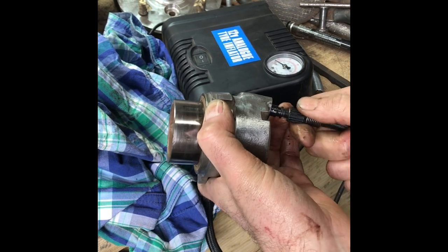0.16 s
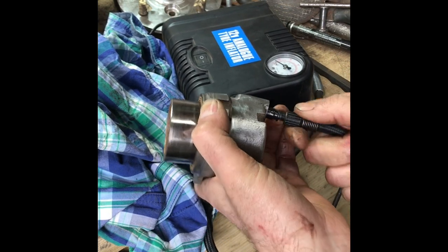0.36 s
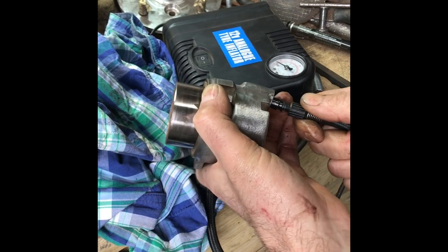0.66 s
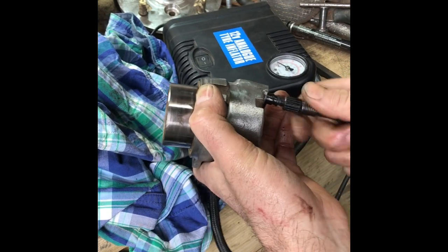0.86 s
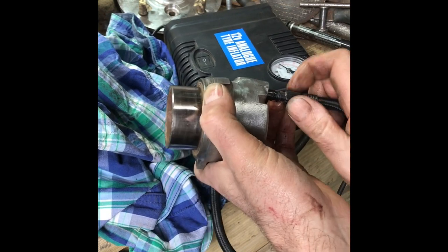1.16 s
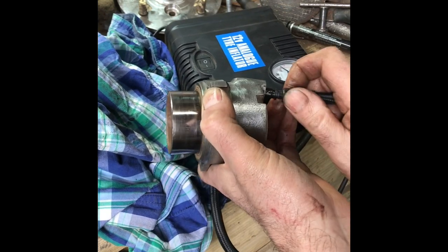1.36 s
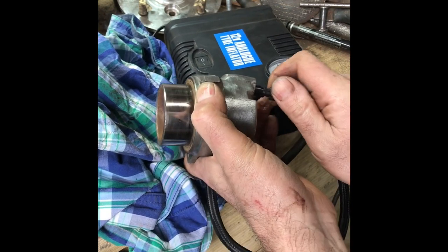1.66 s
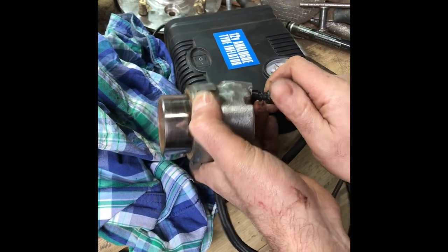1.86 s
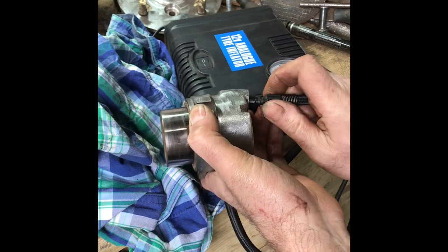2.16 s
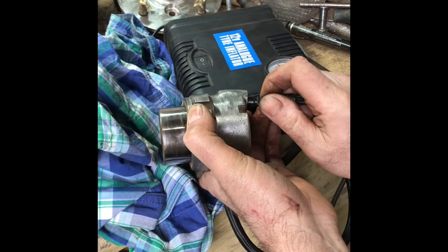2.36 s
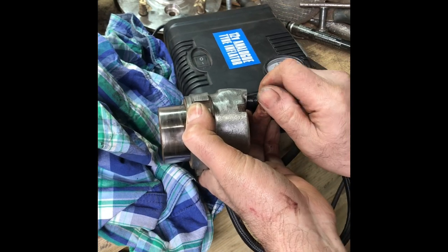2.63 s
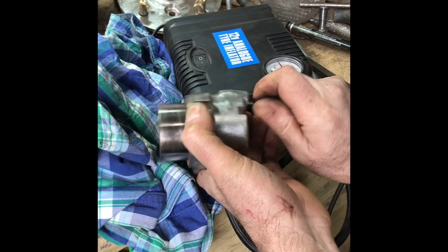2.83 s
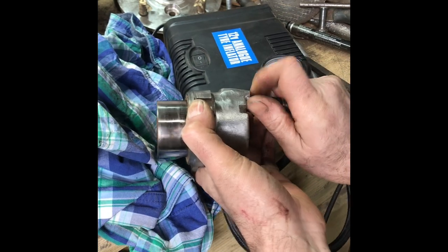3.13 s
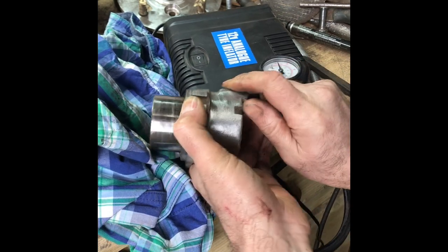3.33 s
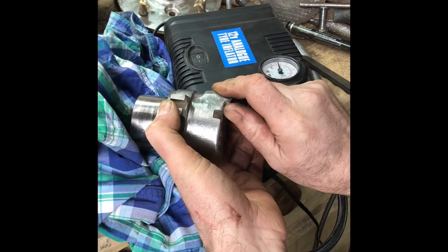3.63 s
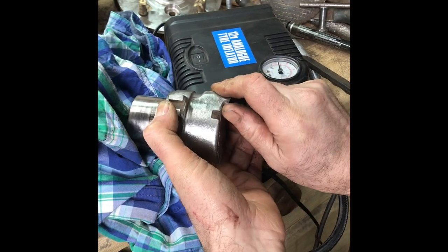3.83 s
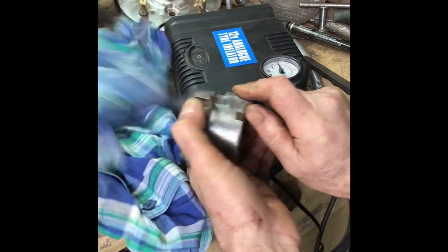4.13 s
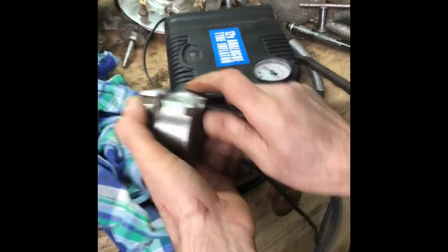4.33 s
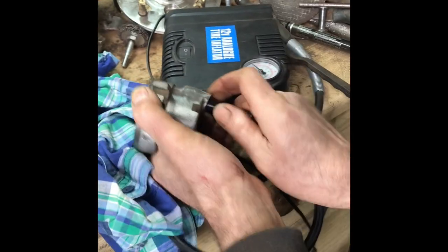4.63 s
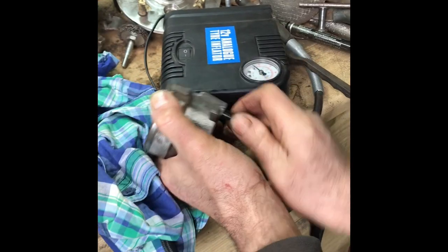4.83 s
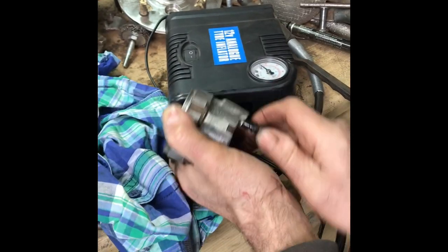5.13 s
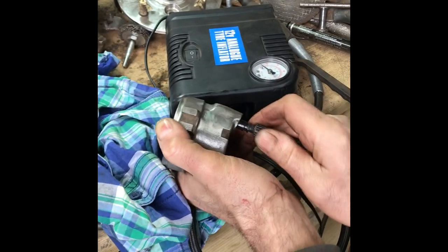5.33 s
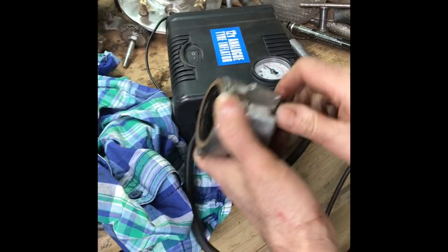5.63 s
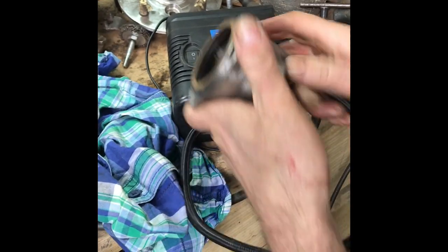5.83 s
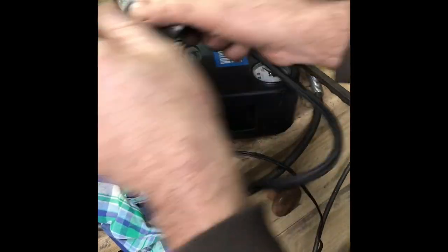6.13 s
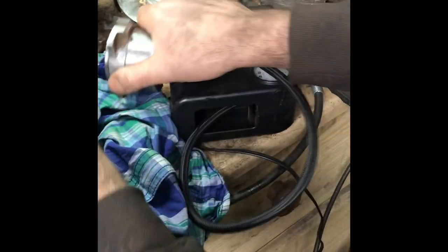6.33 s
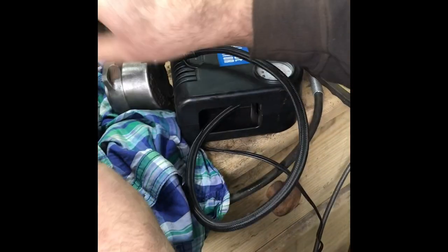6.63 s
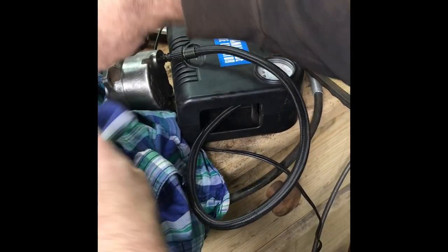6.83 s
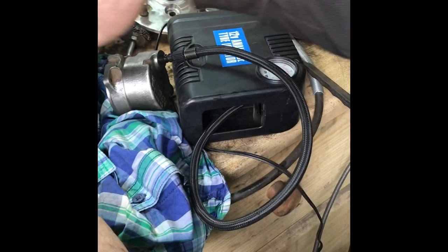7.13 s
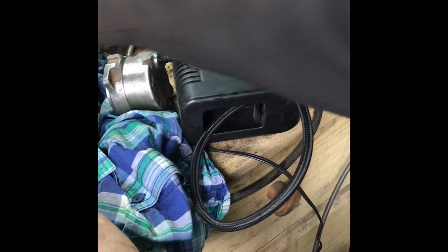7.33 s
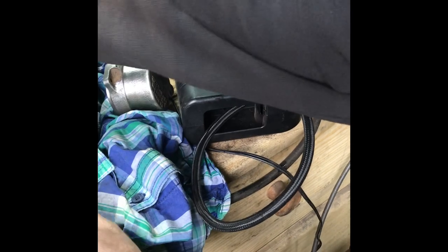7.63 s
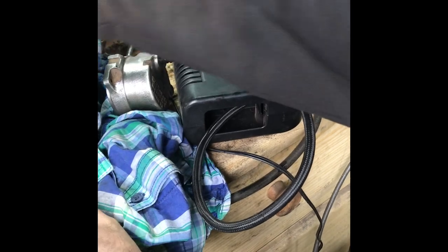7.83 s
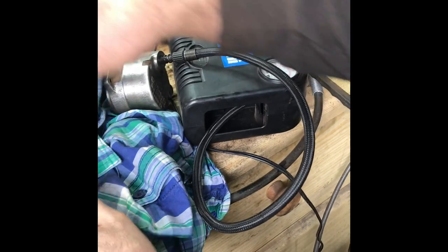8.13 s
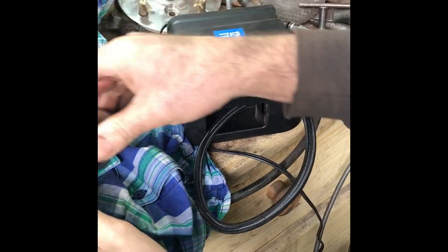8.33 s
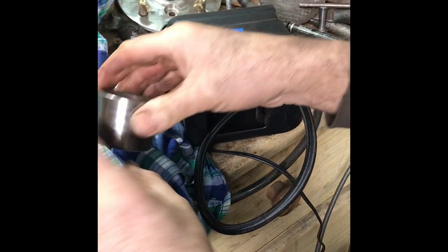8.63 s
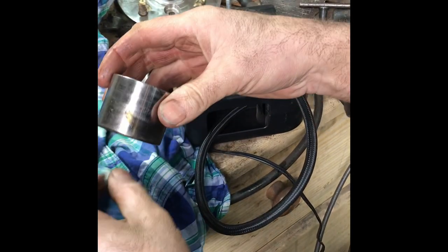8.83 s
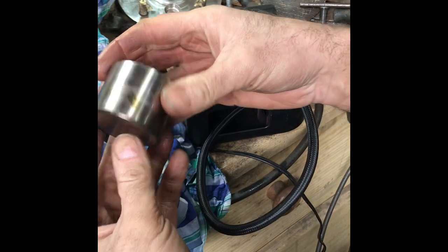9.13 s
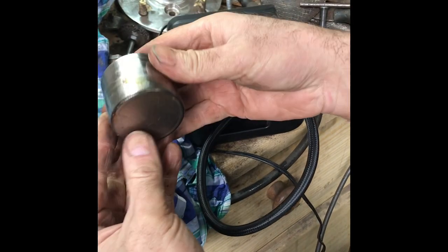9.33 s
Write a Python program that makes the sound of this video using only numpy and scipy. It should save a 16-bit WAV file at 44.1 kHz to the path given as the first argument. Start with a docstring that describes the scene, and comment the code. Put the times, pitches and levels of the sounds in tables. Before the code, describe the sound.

Close and dry at a workshop bench, a tyre pump drones with hard metallic clatter and a low hum. Its pitch sags under load while a nasal valve tone grows. A piston pops free with a thumping air blast, pushing the sound down before it recovers. Faster, steadier rattling continues with uneven airy puffs, faint rubbing, a solid knock as metal is laid on the bench, and a fine whistle.

```python
"""A small piston tyre inflator rattles and hums on a workbench, slowing as it pumps up a steel cylinder.
The cylinder's piston pops loose with a burst of air; the microphone's gain control ducks and creeps back.
The unloaded pump runs on faster, puffing and whistling through the open cylinder, as hands shift the parts.
Crank-timed blows and noise ring through resonances for the pump; struck modes make the pop and bumps,
and filtered noise makes the burst and the rubbing."""
import sys
import numpy as np
from scipy import signal
from scipy.fft import rfft, irfft, next_fast_len
from scipy.io import wavfile
from scipy.ndimage import uniform_filter1d, minimum_filter1d

SR = 44100
rng = np.random.default_rng(int(sys.argv[2]) if len(sys.argv) > 2 else 0)


def inscribe(sig):
    """Save sig as 16-bit PCM at rate SR to the path in sys.argv[1].

    A 1-D sig is mono; a 2-D sig holds one channel per row.
    Samples are clipped to [-1, 1] before scaling.
    """
    pcm = np.round(np.clip(np.atleast_2d(sig).T, -1, 1) * 32767)
    wavfile.write(sys.argv[1], SR, pcm.astype(np.int16))


N = 418068

# crank speed, before a slight wobble: time_s, speed_turns_per_s
CRANK_SPEED = [(0.0, 41.79), (0.16, 41.758), (0.81, 42.25), (1.2, 41.487), (1.56, 41.923), (2.04, 40.814),
               (2.35, 41.141), (2.86, 39.321), (3.48, 38.898), (4.05, 38.824), (4.27, 45.214),
               (4.91, 45.023), (6.23, 45.273), (7.06, 45.148), (9.48, 45.261)]
START_TURNS = .971
# how far the pump has laboured up to full pressure: time_s, share_0_to_1
PRESSURE_CURVE = [(0, .1), (1.8, .2), (2.5, .45), (3.1, .85), (3.5, .97), (4.1, 1)]
RELEASE_S, RELEASE_FADE_S = 4.12, 0.026   # the piston comes loose and the load is gone
SET_DOWN_S, SET_DOWN_FADE_S = 6.35, 0.47   # the cylinder is laid on the bench

# strength of the pump's noises: thud_db, knock_db, valve_clatter_db, gear_rattle_db, air_hiss_db
LIGHT_LEVELS = (-18.5, -17.5, -25.8, -22.5, -28.5)
HEAVY_LEVELS = (-22.5, -24, -23, -22.5, -28.5)
FREE_LEVELS = (-20, -22, -23.5, -22.6, -27)
# answer of the case to a stroke at low pressure, at high pressure and running free:
# pitch_hz, relative_level_db, crank_angle_turns (where that pitch swells)
LIGHT_CASE = [(293, -38, 0.62), (340, -20, 0.49), (375, -12, 0.62), (468, -19.5, 0.56), (505, -14, 0.65),
              (658, -6.5, 0.48), (688, 1.5, 0.61), (810, -4.5, 0.68), (910, -13.5, 0.64), (1015, -12, 0.36),
              (1093, -3, 0.57), (1140, -16, 0.5), (1207, -5, 0.4), (1256, -16, 0.37)]
HEAVY_CASE = [(279, -18.5, 0.663), (308, -40, 0.51), (337, -9.5, 0.52), (462.5, -7, 0.62),
              (475, -10.5, 0.711), (677.5, -4, 0.49), (742, -0.2, 0.43), (757, -24, 0.65),
              (880, -7.5, 0.48), (980, -18, 0.43), (1011, -2.5, 0.57), (1150, -8, 0.46), (1177, -17, 0.33),
              (1260, -15, 0.4)]
FREE_CASE = [(316, -25, .49), (361, -10, .5), (402, -16, .56), (450, -12, .61), (575, -10, .52),
             (630, -7, .58), (685, 2, .62), (760, -9, .64), (815, -5, .7), (865, -15, .66), (950, -11, .6),
             (1080, -7.5, .5), (1185, -7, .56), (1310, -23, .34)]
# colour of the rattling: pitch_hz, relative_level_db
LOADED_COLOUR = [(1200, 3.5), (1400, 5.5), (1750, 2.5), (2000, -8.5), (2300, -8.5), (2950, -11.5),
                 (3800, -13), (4400, -15), (5400, -16), (7700, -20), (8400, -18), (10400, -24),
                 (14500, -16.5), (16000, -21.5)]
FREE_COLOUR = [(710, -7), (1200, 14), (1290, 0.5), (1680, -2), (2790, -14.5), (3910, -13.5), (4450, -20),
               (4800, -17.5), (6650, -20), (7170, -23.5), (9110, -24.5), (10500, -28.5), (11700, -24.5),
               (15800, -23)]
# narrow resonances of the pump head, added to the rattling: pitch_hz, width_hz, gain_db
LOADED_HEAD_RINGS = [(1975, 50, 1), (2140, 50, -4), (2960, 50, -1), (4280, 50, -2), (5250, 150, -3),
                     (5950, 120, -5), (7200, 150, -5)]
FREE_HEAD_RINGS = [(2976, 88, -2), (4444, 83, 9.5), (5210, 99, -7.5), (5930, 76, -1), (7180, 210, 4),
                   (11400, 600, -3)]
# three swells a turn (intake, outlet valve, top of the stroke), as they shape the clatter:
# crank_angle_turns, width_turns, clatter_rise_db, rattle_rise_db, hiss_rise_db
LOADED_SWELLS = [(.07, 0.12, 7, 3.5, 1.5), (.31, 0.08, 8.5, 5, 4), (.485, .06, 7, 4, 0)]
FREE_SWELLS = [(0.0, .1, 4.6, 2.5, 3.7), (.265, 0.068, 9.2, 6.1, 6.3), (.47, .085, 4.8, 3.2, 1.2)]
# rattle and hiss follow the clatter: per step, a lag in turns and a widening of the swell
SWELL_LAG_TURNS, SWELL_STRETCH = 0.023, 1.18
# shaking of the bench, before the rocking change: multiple_of_crank_speed, rms_level_db
LOADED_SHAKE = [(1, -67), (2, -39), (3, -58), (4, -48), (5, -51), (6, -46), (7, -50)]
FREE_SHAKE = [(1, -49), (2, -38.5), (3, -42), (5, -45), (6, -47), (7, -54.5)]
# changes to the low hum: it sinks as pressure builds, and stays weak until the cylinder is laid down
HUM_LIGHT_DB, HUM_HEAVY_DB, HUM_HELD_DB = 0, -9, -5.5
# the valve sings: its level at full pressure, its rise from no pressure to full, its whine against it
VALVE_DB, VALVE_RISE_DB, WHINE_DB = -22.3, 24, -7.5

# hands rub on the parts: start_s, length_s, level_db
HAND_RUBS = [(1.298, 0.24, -34.5), (1.946, 0.26, -35), (2.8, 0.37, -47), (3.2, 0.84, -40),
             (5.0, 0.75, -43.5), (6.203, 0.38, -38)]
RUB_FADE_S, RUMBLE_DB = .14, -44.5   # soft start and end of a rub; the bench's steady rumble
# soft bumps on the bench: time_s, level_db
BENCH_BUMPS = [(1.63, -23), (2.02, -24), (2.86, -29), (3.1, -29), (3.22, -30), (4.22, -11), (4.34, -11),
               (4.39, -15), (6.31, -27), (6.36, -28), (6.473, 2.5), (6.4868, -13), (6.528, -18)]
# ring of the bench: pitch_hz, level_db, time_to_fall_60_db_s
BENCH_RING = [(72, -17, .25), (105, -15, .18), (147, -7, .14), (195, -12, .06), (300, -17, .03)]

# the piston pops and jolts: time_s, level_db
PISTON_JOLTS = [(4.1052, 11), (4.1135, -5), (4.1188, 9.5), (4.1302, 6.5), (4.15, -2)]
# ring of the piston and cylinder: pitch_hz, level_db, time_to_fall_60_db_s
PISTON_RING = [(135, -28, 0.28), (290.5, -11.5, 0.085), (341, -8.5, 0.1), (461, -11, 0.14), (834, -21, .04),
               (1110, -7.5, 0.023), (1276, -11, 0.11), (4570, -14, 0.0039)]
CRACK_DB, CRACK_S = -6, 0.0009   # a sharp crack peaks at the first jolt; time of its rise and of its fall
# the trapped air bursts out with a low thump and dies away
BURST_S, BURST_ATTACK_S, BURST_HOLD_S, BURST_RELEASE_S = 4.103, 0.0068, .048, 0.028
BURST_DB, THUMP_DB, BURST_SAG_DB_PER_S = 3, -12, 230

# a hand or an arm covers the pump and shades its knock: start_s, length_s, change_db
HAND_SHADES = [(3.8, 1.05, -4.5), (6.853, 0.71, -3)]
SHADE_FADE_S = 0.42
# air puffs through the open cylinder as it is lifted and laid down, before the limp: time_s, level_db
PUFF_LEVEL = [(4.2, -23.5), (5.4, -25.5), (5.9, -21.5), (6.35, -23.5), (6.6, -33), (9.4, -53)]
# strong and weak puffs alternate, and the pattern slips slowly against the crank
LIMP_DB, LIMP_SLIP_HZ = 3.5, 0.26
# the air stream whistles in the open cylinder: time_s, level_db
WHISTLE_LEVEL = [(4.1, -70), (5.7, -46), (6.4, -33), (7.5, -32), (9.4, -60)]
HIGH_WHISTLE_DB = -39   # a higher whistle stays once the cylinder is laid down

GAIN_HOLD_S = .195   # how long the gain control holds a cut
CUTOFF_HZ = 15850


def from_db(db):
    """Turn decibels into an amplitude factor."""
    return 10 ** (np.asarray(db) / 20)


def rms_one(x):
    """Scale a sound to an rms level of 1."""
    return x / np.sqrt(np.mean(x ** 2) + 1e-20)


def in_time(rows):
    """Join the points of each curve with straight lines, giving a value at every sample."""
    s, *columns = np.transpose(rows)
    return [np.interp(np.arange(N) / SR, s, c) for c in columns]


def rise(start_s, fade_s):
    """Go from 0 to 1 in a straight line."""
    return np.clip((np.arange(N) / SR - start_s) / fade_s, 0, 1)


def spell(start_s, length_s, fade_s):
    """Fade in, hold and fade out."""
    return rise(start_s, fade_s) - rise(start_s + length_s, fade_s)


def drift(points_per_s):
    """Wander by chance with a spread near 1, in straight lines between random points."""
    knots = rng.standard_normal(N // 40)
    return np.interp(np.arange(N) * points_per_s / SR, np.arange(len(knots)), knots)


def band(x, low_hz, high_hz, order=2):
    """Keep only the pitches between two limits (Butterworth band-pass)."""
    limits = [low_hz, min(high_hz, .45 * SR)]
    return signal.sosfilt(signal.butter(order, limits, "band", fs=SR, output="sos"), x)


def resonate(x, hz, width_hz):
    """Ring at one pitch, with gain 1 at the peak."""
    r = np.exp(-np.pi * width_hz / SR)
    feed = np.array([1, 0, -1]) * (1 - r * r) / 2
    feedback = [1, -2 * r * np.cos(2 * np.pi * hz / SR), r * r]
    return signal.lfilter(feed, feedback, x + 1e-18)


def coloured(x, spectrum):
    """Make some pitches louder and others softer, following a short spectrum."""
    hz, db = np.transpose(spectrum)
    size = next_fast_len(N)
    grid = np.maximum(np.arange(size // 2 + 1) * SR / size, 1)
    gain_db = np.interp(np.log(grid), np.log(hz), db)
    return irfft(rfft(x, size) * from_db(gain_db), size)[:N]


def struck(hits, modes):
    """Each hit sets all modes of a body ringing, neighbours in opposite senses."""
    clicks, out = np.zeros(N), 0
    for s, db in hits:
        clicks[round(s * SR)] = from_db(db)
    for hz, db, t60_s in modes:
        r = from_db(-60 / (t60_s * SR))
        w = 2 * np.pi * hz / SR
        ring = signal.lfilter([0, np.sin(w)], [1, -2 * r * np.cos(w), r * r], clicks + 1e-18)
        out = from_db(db) * ring - out
    return out


def gate(turns, angle, width):
    """A smooth bell-shaped window that opens once a turn."""
    distance = (turns - angle + .5) % 1 - .5
    return np.exp(-(distance / width) ** 2 / 2)


def once_a_turn(turns, angle):
    """One click each time the crank passes an angle, scaled to an rms level of 1."""
    return rms_one(np.diff(np.floor(turns - angle), prepend=np.floor(turns[0] - angle)))


def strokes(turns, levels, case, uneven_db, grit, smear, panel_lag_s):
    """One blow a turn, with friction around it; the case answers with a knock first and a lower thud after."""
    blows = once_a_turn(turns, .5) * from_db(uneven_db * drift(45))
    friction = rms_one(rng.standard_normal(N) * gate(turns, .5, .6))
    hz, db, angle = np.transpose(case)
    size = next_fast_len(N + SR // 10)
    grid = np.arange(size // 2 + 1) * SR / size
    # outside the table, the answer falls by 40 dB per octave
    skirts_db = -40 * np.abs(np.log2((grid + 1) / np.clip(grid, hz[0], hz[-1])))
    case_db = np.interp(grid, hz, db)
    mean_turn_s = N / SR / (turns[-1] - turns[0])
    delay_s = np.interp(grid, hz, angle - .5) * mean_turn_s
    # the panels pass the blow on a few ms apart, which smears it in time
    phase = 2 * np.pi * np.cumsum(delay_s) * SR / size
    phase = phase + smear * np.sin(2 * np.pi * grid * panel_lag_s)
    sound = rfft(blows, size) * from_db(case_db + skirts_db) * np.exp(-1j * phase)
    # friction acts all over the case, so its resonances stand out less
    friction_gain = from_db(0.75 * case_db + skirts_db) * np.minimum(grid / 600, 1)
    sound = sound + grit * rfft(friction, size) * friction_gain
    high_share = np.clip((grid - 860) / 80, 0, 1)
    thud = rms_one(irfft(sound * (1 - high_share), size)[:N])
    knock = rms_one(irfft(sound * high_share, size)[:N])
    return from_db(levels[0]) * thud + from_db(levels[1]) * knock


def scraping(turns, repeat):
    """The same rough surfaces meet on every turn; the rest of the friction is new each time."""
    surface = rng.standard_normal(size=1000)
    worn = rms_one(np.interp(turns % 1, np.linspace(0, 1, len(surface)), surface))
    repeat = np.clip(repeat, 0, 1)
    return np.sqrt(repeat) * worn + np.sqrt(1 - repeat) * rng.standard_normal(N)


def rattling(turns, levels, swells, colour, rings, repeats, uneven_db):
    """Valve clatter, gear rattle and air hiss swell one after the other in each turn and ring in the pump head."""
    edges_hz, out = [1270, 2200, 7000, 19000], 0
    for k, (level, repeat, low, high) in enumerate(zip(levels, repeats, edges_hz, edges_hz[1:])):
        swell_db = 0
        for angle, width, *heights_db in swells:
            window = gate(turns, angle + k * SWELL_LAG_TURNS, width * SWELL_STRETCH ** k)
            swell_db = swell_db + heights_db[k] * window
        envelope = from_db(swell_db + uneven_db * drift(500))
        drive = coloured(scraping(turns, repeat) * envelope, colour)
        drive = drive + sum(from_db(db) * resonate(drive, hz, width) for hz, width, db in rings)
        out = out + from_db(level) * rms_one(band(drive, low, high, order=4))
    return out


def shaking(turns, orders, rocking_db):
    """The unbalanced crank hums through the bench; its lowest three orders follow the rocking."""
    tones = []
    for multiple, db in orders:
        wave = np.sin(2 * np.pi * (round(multiple) * turns + rng.random()))
        tones.append(from_db(db) * np.sqrt(2) * wave)
    return from_db(rocking_db) * sum(tones[:3]) + sum(tones[3:])


def air_tone(turns, hz, width_hz, angle, length, kick_strength, uneven_db):
    """One puff of air a turn, a kick and a rush of noise, blows a resonance."""
    kick = once_a_turn(turns, angle)
    rush = rms_one(rng.standard_normal(N) * gate(turns, angle, length))
    puffs = (kick_strength * kick + rush) * from_db(uneven_db * drift(45))
    return rms_one(resonate(resonate(puffs, hz, width_hz), hz, width_hz))


def loaded_pump(turns):
    """Rising pressure dulls the strokes, calms the hum and makes the valve sing."""
    pressure = np.clip(in_time(PRESSURE_CURVE)[0], 0, 1)
    thud_db, knock_db, *rattle_db = [light + (heavy - light) * pressure
                                     for light, heavy in zip(LIGHT_LEVELS, HEAVY_LEVELS)]
    light = strokes(turns, (thud_db, knock_db), LIGHT_CASE,
                    uneven_db=0.35, grit=0.36, smear=0.72, panel_lag_s=0.004208)
    heavy = strokes(turns, (thud_db, knock_db), HEAVY_CASE,
                    uneven_db=0.5, grit=0.31, smear=0.97, panel_lag_s=0.004217)
    body = np.sqrt(1 - pressure) * light + np.sqrt(pressure) * heavy
    rattle = rattling(turns, rattle_db, LOADED_SWELLS, LOADED_COLOUR, LOADED_HEAD_RINGS,
                      repeats=(.65, .5, .25), uneven_db=1.85)
    hum = shaking(turns, LOADED_SHAKE, HUM_LIGHT_DB + (HUM_HEAVY_DB - HUM_LIGHT_DB) * pressure)
    valve = air_tone(turns, hz=1788, width_hz=55, angle=.13, length=.1, kick_strength=3.2, uneven_db=.8)
    whine = air_tone(turns, hz=4280, width_hz=70, angle=.05, length=.15, kick_strength=1.8, uneven_db=1.0)
    singing_db = VALVE_DB - VALVE_RISE_DB * (1 - pressure)
    singing = from_db(singing_db) * (valve + from_db(WHINE_DB) * whine)
    return body + rattle + hum + singing


def handling():
    """Dull, uneven rubbing that also shakes the bench, a steady rumble and a few bumps."""
    grip = rng.standard_normal(N) * from_db(3.6 * drift(21))
    rub = rms_one(band(grip, 93, 267)) + from_db(-9) * rms_one(band(grip, 56, 96))
    force = sum(from_db(db) * spell(s, length, RUB_FADE_S) for s, length, db in HAND_RUBS)
    return np.hypot(force, from_db(RUMBLE_DB)) * rub + struck(BENCH_BUMPS, BENCH_RING)


def pop():
    """The piston jolts loose with a crack and the trapped air bursts out as low noise."""
    age_s = np.maximum(np.arange(N) / SR - BURST_S, 0)
    opening = rise(BURST_S, BURST_ATTACK_S) - rise(BURST_S + BURST_HOLD_S, BURST_RELEASE_S)
    air = rms_one(band(band(rng.standard_normal(N), 76, 1500, order=4), 40, 640, order=1))
    thump = rms_one(band(rng.standard_normal(N), 40, 128))
    burst = from_db(BURST_DB) * air + from_db(THUMP_DB) * thump
    burst = opening * from_db(-BURST_SAG_DB_PER_S * age_s) * burst
    crack_window = spell(PISTON_JOLTS[0][0] - CRACK_S, CRACK_S, CRACK_S)
    crack = from_db(CRACK_DB) * crack_window * rng.standard_normal(N)
    return struck(PISTON_JOLTS, PISTON_RING) + crack + burst


def free_pump(turns):
    """With no load the pump's strokes and rattle no longer follow the pressure."""
    thud_db, knock_db, *rattle_db = FREE_LEVELS
    shade_db = sum(db * spell(s, length, SHADE_FADE_S) for s, length, db in HAND_SHADES)
    body = strokes(turns, (thud_db, knock_db + shade_db), FREE_CASE,
                   uneven_db=0.45, grit=0.56, smear=0.95, panel_lag_s=0.00365)
    rattle = rattling(turns, rattle_db, FREE_SWELLS, FREE_COLOUR, FREE_HEAD_RINGS,
                      repeats=(.25, .2, .1), uneven_db=1.6)
    hum = shaking(turns, FREE_SHAKE, HUM_HELD_DB * (1 - rise(SET_DOWN_S, SET_DOWN_FADE_S)))
    return body + rattle + hum


def open_cylinder(turns):
    """The pumped air puffs and whistles through the empty cylinder."""
    slip = LIMP_SLIP_HZ * (np.arange(N) / SR - RELEASE_S)
    limp_db = LIMP_DB * np.cos(np.pi * turns + 2 * np.pi * slip)
    puff = air_tone(turns, hz=1454, width_hz=150, angle=0.0398, length=0.12,
                    kick_strength=1.2, uneven_db=1.3)
    whistle = air_tone(turns, hz=4435, width_hz=180, angle=0.0484, length=0.07,
                       kick_strength=0.23, uneven_db=2.0)
    high_whistle = air_tone(turns, hz=7280, width_hz=130, angle=0.8, length=0.08,
                            kick_strength=.2, uneven_db=1.5)
    puff = from_db(in_time(PUFF_LEVEL)[0] + limp_db) * puff
    whistle = from_db(in_time(WHISTLE_LEVEL)[0]) * whistle
    high_whistle = from_db(HIGH_WHISTLE_DB) * rise(SET_DOWN_S, SET_DOWN_FADE_S) * high_whistle
    return puff + whistle + high_whistle


def scene():
    """One crank times all the pump's sounds: first under load, then running free after the pop."""
    turns = START_TURNS + np.cumsum(in_time(CRANK_SPEED)[0]) / SR + 0.0021 * drift(25)
    released = rise(RELEASE_S, RELEASE_FADE_S)
    free = free_pump(turns) + open_cylinder(turns)
    pump = np.sqrt(1 - released) * loaded_pump(turns) + np.sqrt(released) * free
    return (pump + handling() + pop())[None]


def gain_control(x, ceiling, hold_s, quick_db, release_s):
    """An overload pulls the gain down and holds it; part of the cut then lets go at once, the rest creeps back."""
    over_db = 20 * np.log10(np.maximum(np.abs(x) / ceiling, 1))
    half_hold = int(hold_s * SR) // 2
    held_db = -minimum_filter1d(-over_db, 2 * half_hold + 1, origin=half_hold)
    fading = np.exp(-np.arange(N) / SR / release_s)
    slow_db = np.maximum.accumulate(np.maximum(over_db - quick_db, 0) / fading) * fading
    cut_db = uniform_filter1d(np.maximum(held_db, slow_db), size=200)
    return x * from_db(-cut_db)


def record(dry):
    """Gain control, flattened peaks and a steep cut of the highest treble."""
    levelled = gain_control(dry[0], ceiling=0.875, hold_s=GAIN_HOLD_S, quick_db=1.5, release_s=0.86)
    clipped = np.clip(levelled, -.95, .95)
    return signal.sosfilt(signal.ellip(12, .1, 80, CUTOFF_HZ, fs=SR, output="sos"), clipped)[None]


dry = scene()
out = record(dry)
inscribe(out)
```